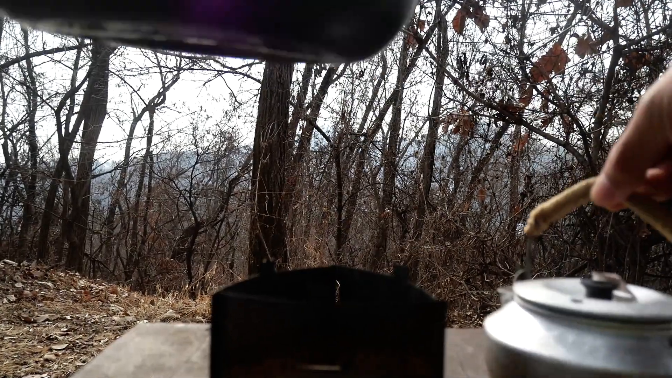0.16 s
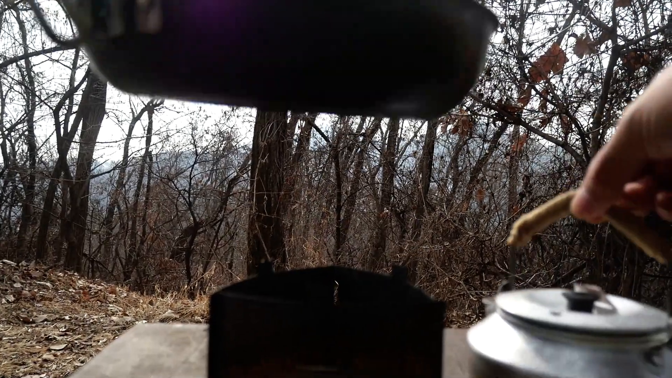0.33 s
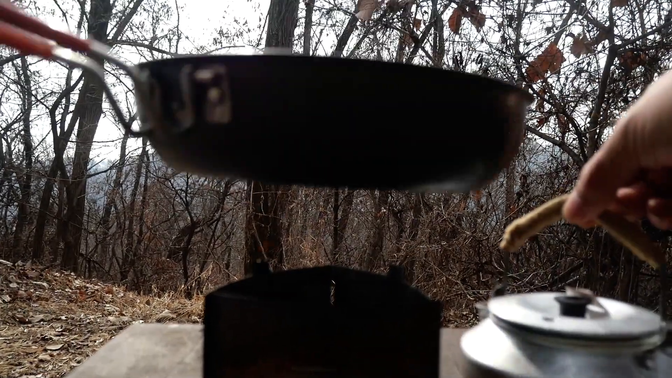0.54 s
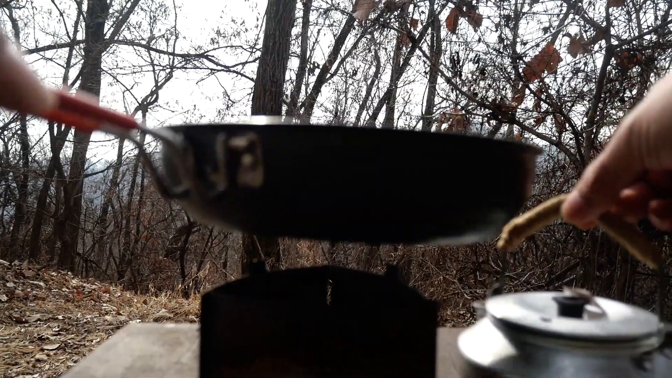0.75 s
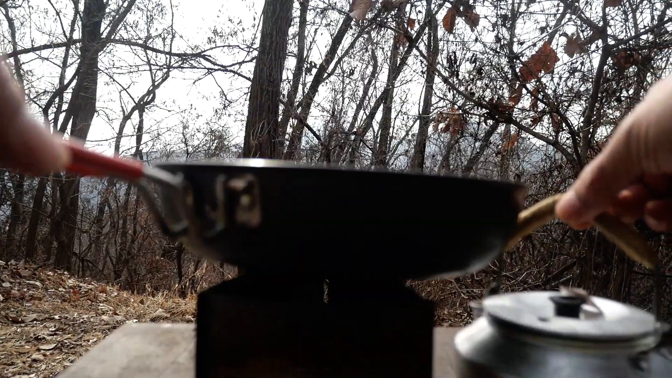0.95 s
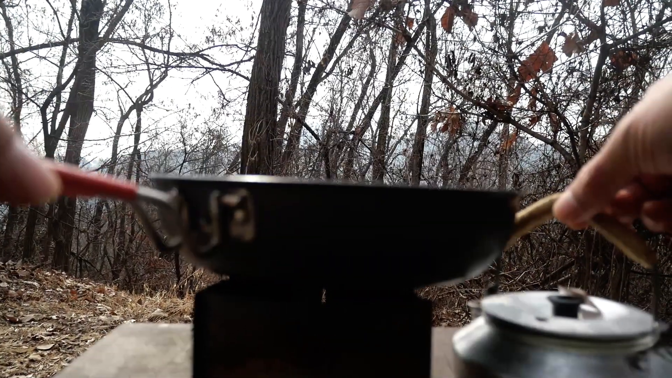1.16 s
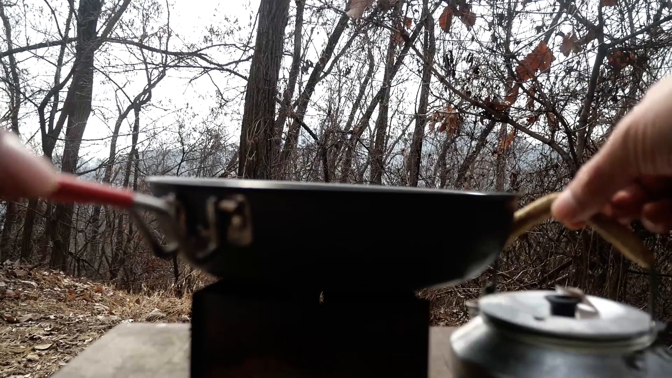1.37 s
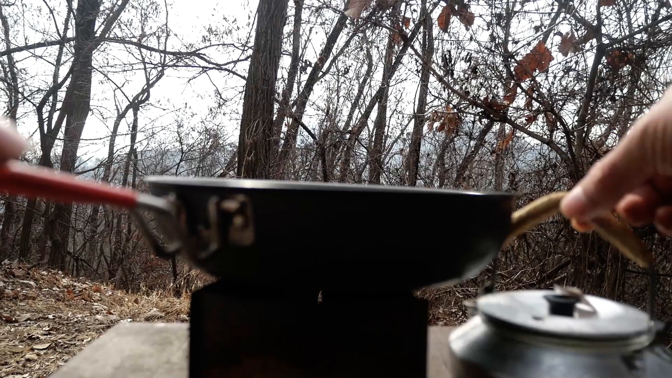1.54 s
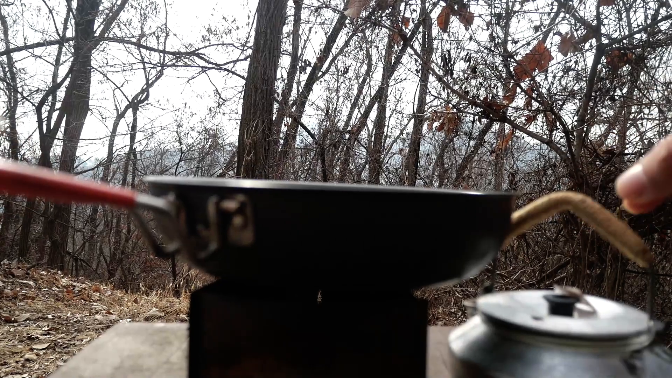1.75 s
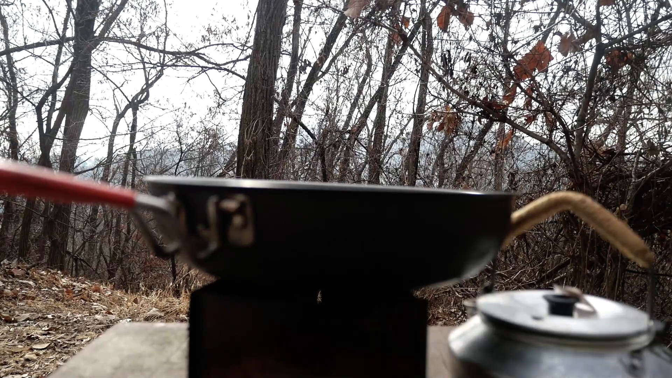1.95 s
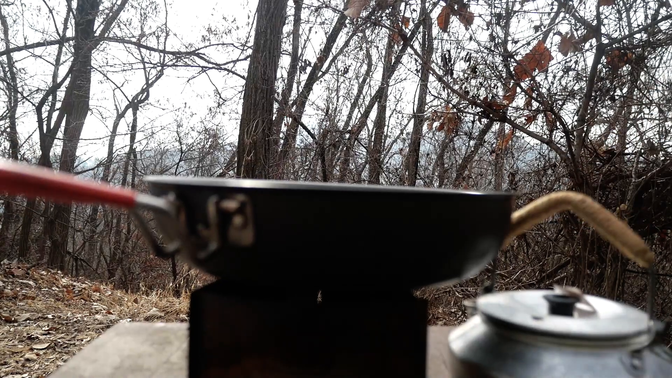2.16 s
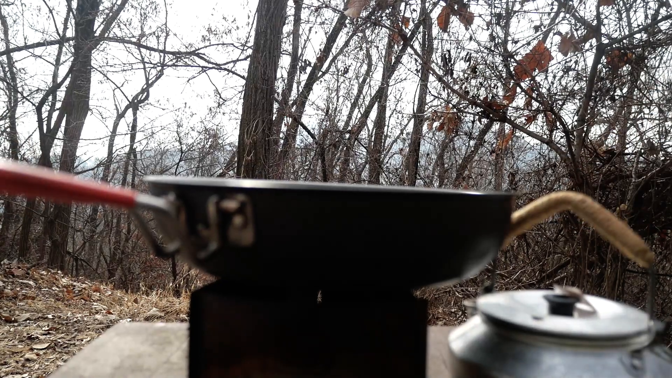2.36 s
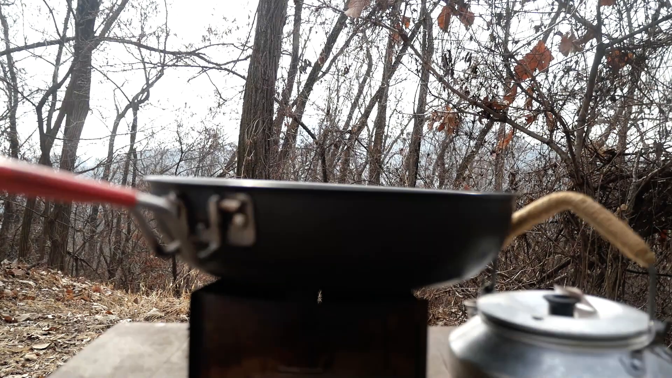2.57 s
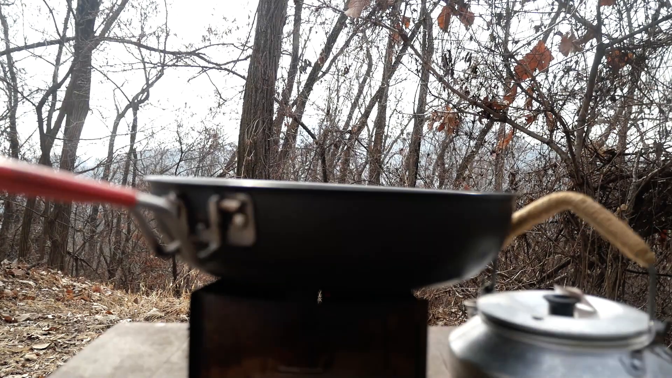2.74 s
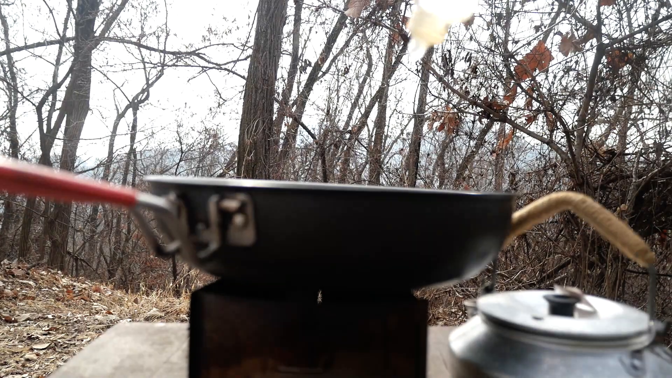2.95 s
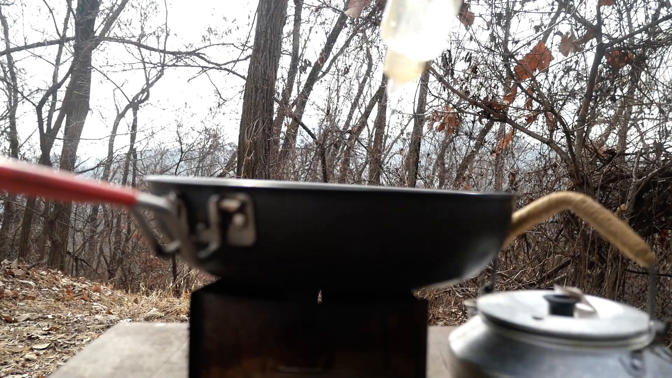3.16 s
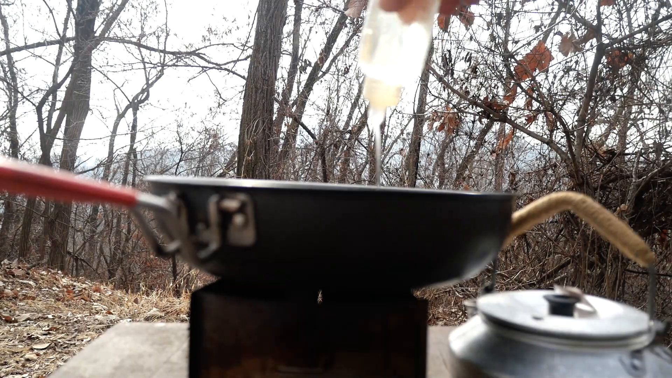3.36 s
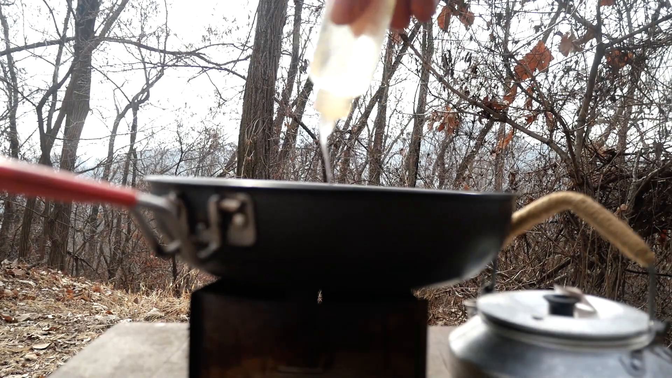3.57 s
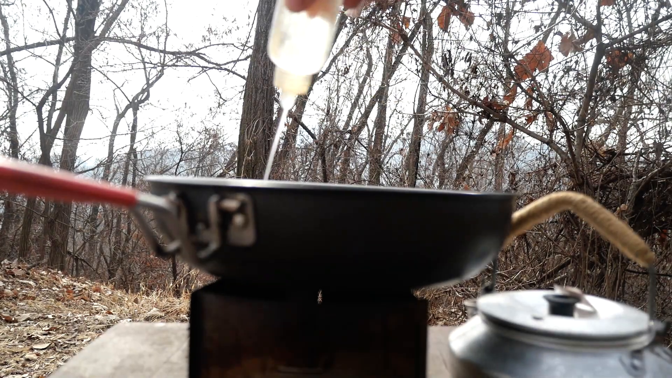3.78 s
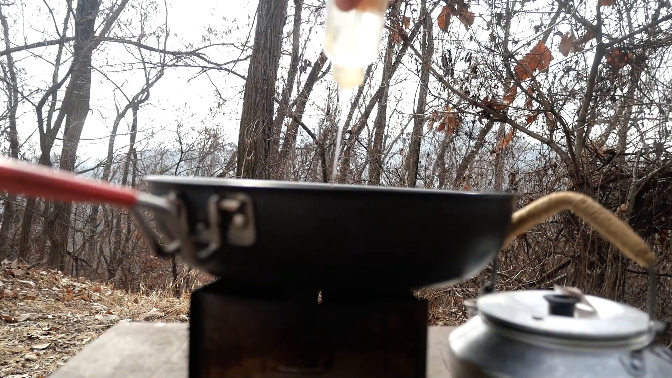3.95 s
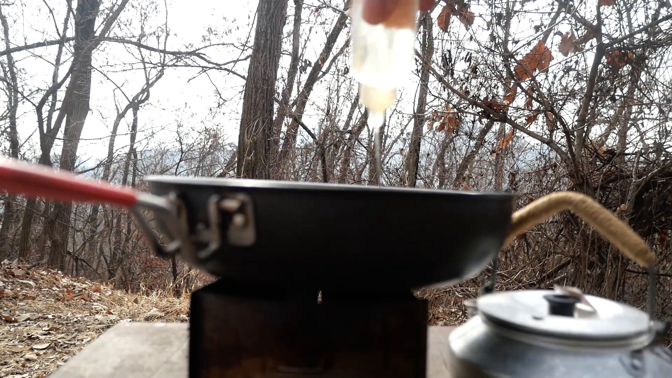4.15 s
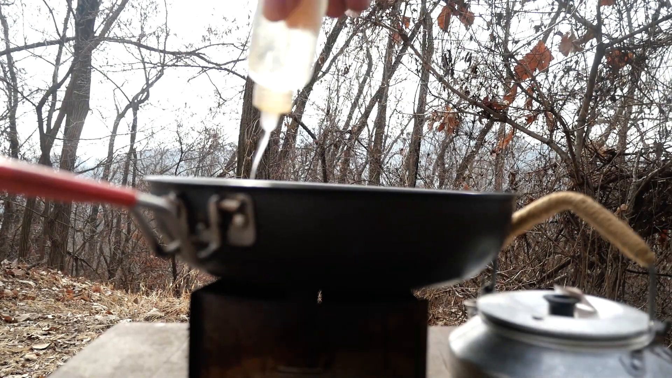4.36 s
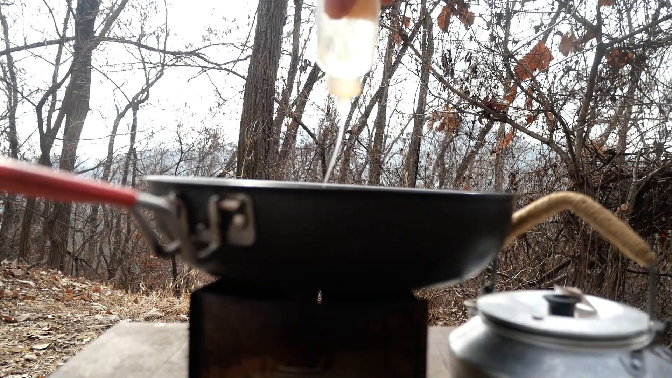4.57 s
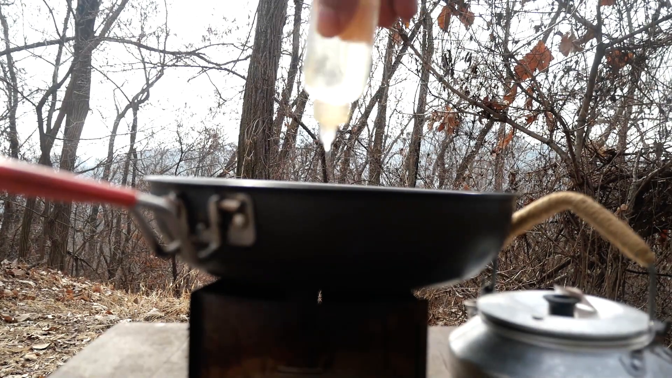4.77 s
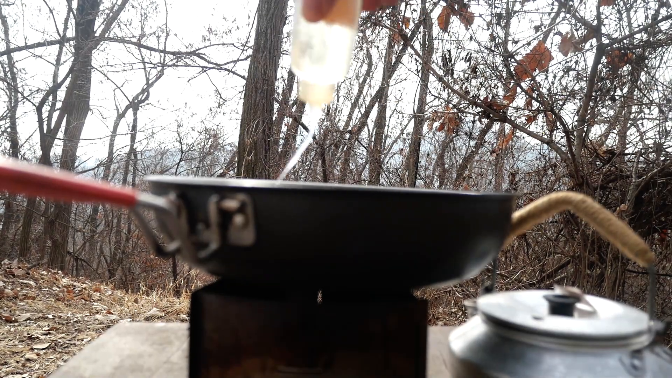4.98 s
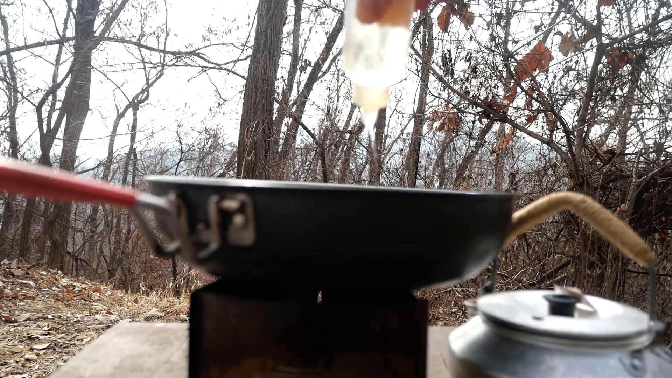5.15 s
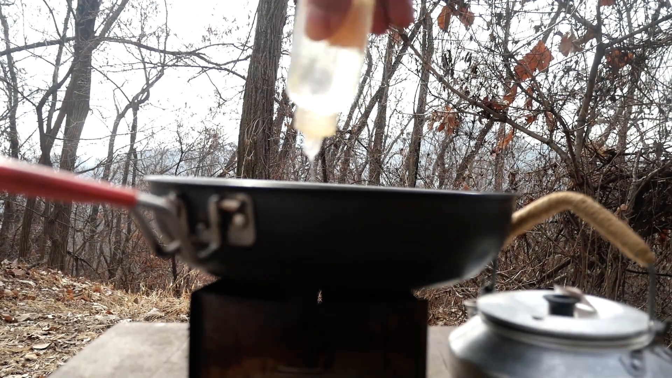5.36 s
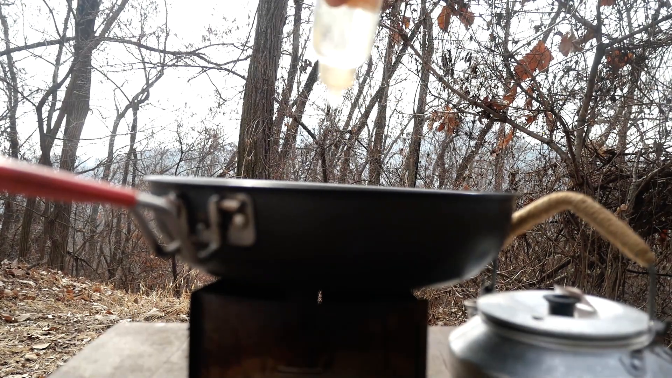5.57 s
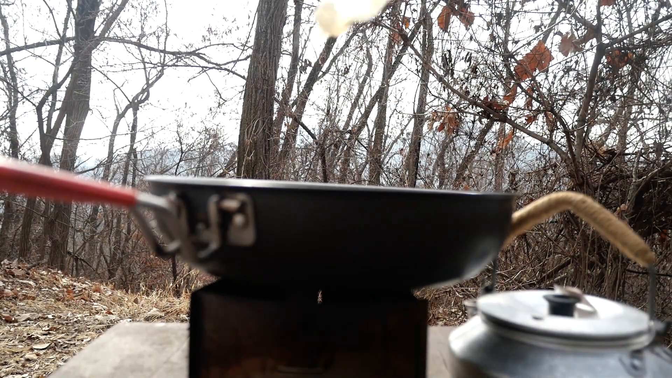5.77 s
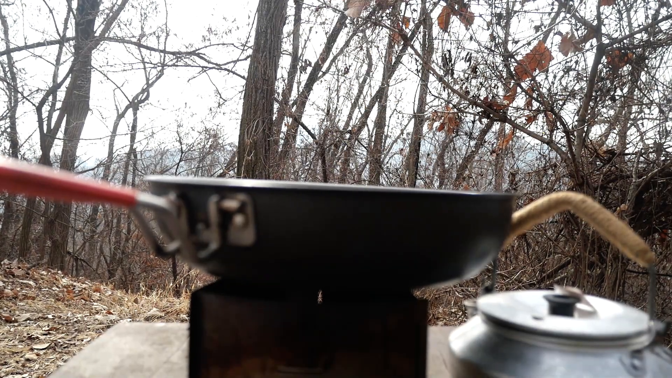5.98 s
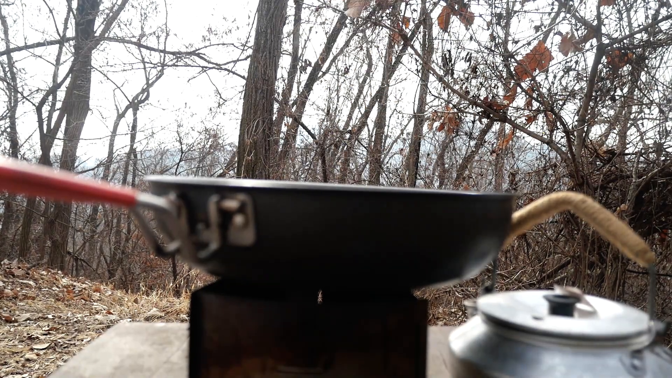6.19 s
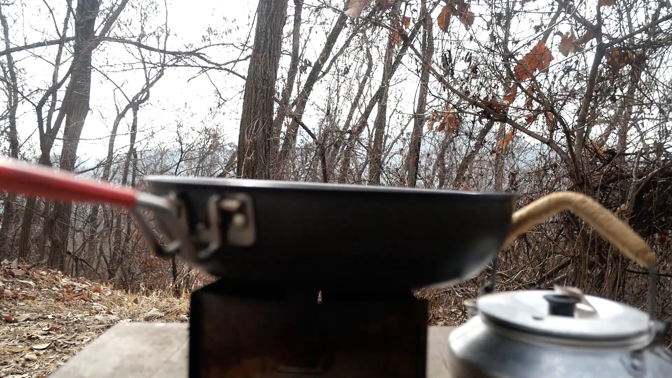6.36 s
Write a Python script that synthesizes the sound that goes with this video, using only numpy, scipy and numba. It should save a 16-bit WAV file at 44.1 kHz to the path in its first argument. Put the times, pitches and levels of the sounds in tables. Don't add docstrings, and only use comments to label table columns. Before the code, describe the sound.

Faint air, hiss and a low hollow stove hum lie under everything. Stiff sleeves brush near the microphones; a heavy kettle lands with a damped clunk at half a second. Soon a pan clanks loudly onto thin metal, rebounding in quick ringing knocks. A calm stretch with sparse dry ticks follows, then squeezed-bottle suction whistles, a crisp cap click and a last sleeve rustle, all close and dry.

```python
import sys
import numpy as np
from scipy import signal
from scipy.fft import rfft, irfft
from scipy.io import wavfile
from scipy.ndimage import uniform_filter1d
from numba import njit

SR = 44100
rng = np.random.default_rng(int(sys.argv[2]) if len(sys.argv) > 2 else 0)


def wav_record(signal):
    frames = np.transpose(np.atleast_2d(signal))
    bounded = np.clip(frames, -1, 1)
    quanta = np.round(bounded * 32767).astype(np.int16)
    wavfile.write(sys.argv[1], SR, quanta)


def invert_db(level):
    return 10 ** (np.asarray(level, dtype=float) / 20)


N = 283116
TIME = np.arange(N) / SR


def level(x, db):
    return x * invert_db(db) / np.sqrt(np.mean(x ** 2))


def sides(left_minus_right_db):
    return invert_db(np.array([left_minus_right_db, -left_minus_right_db]) / 2).reshape(2, -1)


@njit
def svf(x, hz, width):
    y, band_state, low_state = np.empty(len(x)), 0., 0.
    for i in range(len(x)):
        g, damping = np.tan(np.pi * hz[i] / SR), width / hz[i]
        v = (band_state + g * (x[i] - low_state)) / (1 + g * (g + damping))
        band_state, low_state = 2 * v - band_state, low_state + 2 * g * v
        y[i] = damping * v
    return y


def band(x, hz, width):
    return svf(x, np.full(len(x), 1. * hz), 1. * width)


def walk(rate):
    hold = int(SR / rate)
    steps = np.repeat(rng.standard_normal(N // hold + 1), hold)
    return 1.3 * uniform_filter1d(uniform_filter1d(steps, hold), hold)[:N]


def add(out, s, sound):
    i = int(s * SR)
    out[:, i:i + sound.shape[1]] += sound[:, :N - i]


def ring(modes, seconds, tilt_db, scatter_db, spread_db, push_s):
    hz, db, t60 = np.transpose(modes)[:, :, None]
    t = TIME[:int(seconds * SR)]
    strength, aim = rng.standard_normal((len(modes), 2)).T[:, :, None]
    gain = invert_db(db + tilt_db * np.log2(hz / 1000) + scatter_db * strength - 60 * t / t60)
    polarity = np.sign(np.cos(hz / 150))
    onset = 1 - np.exp(-t / push_s)
    tone = gain * np.sin(2 * np.pi * hz * t) * polarity * onset
    aim_db = spread_db * np.sqrt(hz / 2000) * aim
    return np.array([np.sum(tone * invert_db(side * aim_db), axis=0) for side in (1, -1)])


def crack(db, t60, low_hz, high_hz, wide):
    n = SR // 10
    mid, side = rng.standard_normal((2, n)) * invert_db(db - 60 * TIME[:n] / t60)
    edges = signal.butter(2, [low_hz, min(high_hz, .45 * SR)], "band", fs=SR)
    return signal.lfilter(*edges, [mid + wide * side, mid - wide * side])


def small_knocks(events, spread, late_s, t60_1k, shorten):
    out = np.zeros((2, N))
    for s, db, hz, crack_db, *aside in events:
        t60 = t60_1k * (1000 / hz) ** shorten
        place = sides(aside[0] if aside else 0)
        cluster = [(hz, 0, t60),
                   (hz * (1 - spread), -7, 0.59 * t60),
                   (hz * (1 + spread), -7, .7 * t60),
                   (hz * 1.6, -16, 0.32 * t60)]
        add(out, s + late_s, ring(cluster, .15, 0, 1.8, 0.78, 0.000517) * invert_db(db - 1.0) * place)
        burst = crack(db + crack_db, 0.15 * t60 + .004, .7 * hz, min(3.5 * hz, 9500), .3)
        add(out, s + late_s, burst * place)
    return out


def whistle(puffs, width, upper, flutter_db):
    swell, fade, glide, edge_db = .15, .35, .6, -10
    out = 0
    for s, length, from_hz, to_hz, db in puffs:
        part = (TIME - s) / length
        pitch = to_hz + (from_hz - to_hz) * np.exp(-np.maximum(part, 0) / glide)
        shape_db = np.interp(part, [0, swell, 1 - fade, 1], [edge_db, 0, 0, edge_db], left=-99, right=-99)
        air = svf(rng.standard_normal(N), pitch, width)
        air = air + upper * svf(rng.standard_normal(N), 1.18 * pitch, 0.85 * width)
        air = svf(air, 1.07 * pitch, 4.7 * width)
        out = out + level(air, 0) * invert_db(db + shape_db + flutter_db * walk(40))
    return out * sides(0.85)


def sleeves():
    # (time [s], effort [dB], brushing tilt [dB per band step], left minus right [dB])
    movement = [(0, -67, 0, 4), (.16, -63.5, 2, 5), (.34, -61, 1.2, 5.5), (.62, -62.5, 0, 6),
                (.72, -64.5, -4.5, 2.5), (.92, -65, -.5, 6), (1.14, -68.5, -4, 3), (1.7, -70.5, 0, 3),
                (2.55, -70, 1.5, 3), (2.57, -63.5, 2.2, 12), (2.69, -61, 2.5, 11), (2.78, -70, -2, 1.5),
                (3.3, -74, -.5, 1.5), (3.46, -68, -1, 3.5), (3.75, -77, -1.2, 3), (5.82, -78, -1, 4),
                (5.95, -71, -3.5, 0), (6.32, -61, 2.2, 4)]
    # (low edge [Hz], high edge [Hz], level [dB])
    cloth_bands = [
        (170, 1150, 2.2),
        (1500, 5500, -2),
        (5300, 9140, -2),
        (10500, 15300, 1),
    ]
    lumps_db, widths = (3.2, 2.5, 1.2, .8), (.3, .6, .9, .95)
    s, *controls = np.transpose(movement)
    effort_db, brush_db, lr_db = (np.interp(TIME, s, c) for c in controls)
    out = 0
    for k, ((*edges_hz, db), lump_db, wide) in enumerate(zip(cloth_bands, lumps_db, widths)):
        slips = invert_db(lump_db * walk(60))
        cloth = signal.butter(2, edges_hz, "band", fs=SR, output="sos")
        mid, side = (level(signal.sosfilt(cloth, rng.standard_normal(N) * slips), 0) for _ in range(2))
        gain = invert_db(effort_db + brush_db * (k - 1.5) + db - 3.5)
        out = out + gain * (mid + wide * side * np.array([[1], [-1]]))
    rumble = band(band(rng.standard_normal(N), 110, 150), 73, 200)
    shake = level(rumble, 0) * invert_db(effort_db - 1.4 * brush_db - 7)
    return out * sides(lr_db) + shake


def wood():
    # (frequency [Hz], density [dB per Hz])
    spectrum = [(15, -37.5), (25, -3.5), (117, -5.5), (285, -6.5), (326, -8.5), (384, -3), (416, -12),
                (754, -7.5), (1480, -14), (1790, -19), (16000, -26)]
    # (frequency [Hz], likeness [0-1])
    coherence = [(60, 0.73), (130, 0), (290, 0.46), (640, 0.9), (1410, 0.1), (3100, 0.07), (6820, 0),
                 (15000, 0)]
    log_hz = np.log(np.fft.rfftfreq(N, 1 / SR) + 1)
    spectrum_hz, spectrum_db = np.transpose(spectrum)
    like_hz, likeness = np.transpose(coherence)
    shape = invert_db(np.interp(log_hz, np.log(spectrum_hz), spectrum_db))
    like = np.clip(np.interp(log_hz, np.log(like_hz), likeness), 0, 1)
    mid, side = (irfft(rfft(rng.standard_normal(N)) * shape * np.sqrt(1 + sign * like), N) for sign in (1, -1))
    air = level(np.array([mid + side, mid - side]), -63.5 - 4.0) * invert_db(.6 * walk(3))
    flame = rng.standard_normal(N) * invert_db(3.0 * np.tanh(walk(14)))
    cavity_hz = 745
    return air + level(band(band(flame, cavity_hz, 70), cavity_hz, 130), -78.5)


def handling_ticks():
    # (time [s], peak [dB], pitch [Hz], crack over peak [dB])
    events = [(0.292, -45, 335.5, -8), (0.365, -49.5, 1180, -15), (0.513, -52, 850, 4),
              (0.718, -47, 600, -6), (.743, -48, 750, -6), (0.759, -46, 360, 0), (.768, -48, 330, -3),
              (.779, -53, 900, -5), (0.797, -48, 250, -8), (.817, -52, 220, 0), (.831, -52, 650, -3),
              (0.841, -51, 740, -3), (.857, -53, 300, -3), (.877, -52, 480, -3), (.932, -55, 400, -3),
              (0.969, -48, 517, -2), (1.022, -44, 1084, -5), (1.035, -52, 600, -3), (1.068, -51, 450, 0),
              (1.082, -52, 350, 3), (1.141, -56, 856, -12), (2.618, -51.5, 720, 0), (2.675, -48.5, 306, 15),
              (2.8, -48, 400, 8), (3.005, -55, 247, -6.5), (3.091, -47.5, 675, -5), (3.441, -52, 600, -2),
              (3.451, -50, 443, 13), (3.465, -46.5, 420, 17), (3.553, -56, 365.5, -8),
              (5.758, -53, 638, -5), (5.79, -58.5, 566, -10), (5.896, -58, 700, 0), (5.912, -43, 560, -10),
              (5.924, -50, 600, 0), (5.935, -48, 450, 0), (5.939, -54, 1250, -8), (5.9555, -42, 480, -6),
              (5.965, -53, 500, 0), (6.114, -55, 272, -9), (6.253, -52, 300, 3), (6.267, -53, 350, 0),
              (6.286, -54, 330, 0), (6.297, -53, 380, 0), (6.313, -54, 450, 0), (6.341, -55, 350, 0)]
    return small_knocks(events, .3, .0015, .028, .05)


def kettle():
    # (frequency [Hz], level [dB], t60 [s])
    modes = [(100, -30, 0.08), (225, -9, 0.048), (346, -7, 0.016), (468, -5.5, 0.038), (600, -1.5, 0.038),
             (796, 1, 0.013), (972, -7, 0.013), (1400, -3, 0.022), (1620, -8, .02), (1975, -1.5, 0.03),
             (2770, -5.5, 0.044), (2840, -16, 0.073), (3500, -16, .012), (4310, -26.5, 0.19),
             (4700, -14, 0.018), (5220, -9.5, 0.028), (6350, -15, 0.013), (7150, -25.5, 0.01)]
    # (time [s], body [dB], tilt [dB per octave], crack [dB], left minus right [dB])
    bumps = [(.552, -52, 0, -55, -2), (0.558, -47, -5, -49, -2.5), (0.5613, -35, -3, -41.5, -2),
             (0.567, -37, -8, -48, 0), (0.5722, -28.5, -8, -45, -1.5), (0.5758, -32, 2, -42, -0.5),
             (.579, -38, 1, -48, 0), (0.584, -38, -2.5, -50, -9), (.5885, -29, 0, -36, -1),
             (.596, -25, 3.5, -26, -6), (.6010, -36, -1, -30, 0.5)]
    # (on the edge [dB], tipping flat [dB], lid ticking [dB])
    freedom_db = [(10, 8, 8), (1, 1, -2), (1, 1, 0), (1, 1, 3), (1, 1, 4), (1, 1, 2), (1, 1, 1), (-3, 2, 3),
                  (2, -3, -1), (-1, -1, 0), (-3, -3, -1), (-2, 0, 2), (0, 2, 5), (-8, -6, -3), (-2, -1, 1),
                  (-9, -5, -6), (-4, -1, -1), (-4, 1, 0)]
    tips_s = [.586, .594]
    out = np.zeros((2, N))
    for s, body_db, tilt_db, crack_db, lr_db in bumps:
        held = np.array(modes)
        held[:, 1] += np.array(freedom_db)[:, np.searchsorted(tips_s, s)]
        add(out, s, ring(held, 0.34, tilt_db, 1.5, 1.5, 0.00064) * invert_db(body_db) * sides(lr_db))
        add(out, s, crack(crack_db, 0.036, 1500, 9000, .6) * sides(lr_db))
    return out


def pan_handle():
    # (start [s], length [s], from [Hz], to [Hz], level [dB])
    squeaks = [
        (.70, .09, 3350, 3300, -78),
        (.845, .04, 3300, 3300, -75),
        (.89, .03, 3500, 3450, -76),
        (.915, .03, 3100, 2950, -74),
        (.96, .04, 3300, 3300, -76),
        (1.13, .05, 3100, 3350, -69),
    ]
    return whistle(squeaks, 140., 0, 6.5)


def stove():
    # (frequency [Hz], level [dB], t60 [s])
    modes = [(100, -27, 0.1), (185, -13, 0.16), (233.8, -18.5, 0.19), (344, -18, 0.046), (560, -13, 0.03),
             (689, -1.5, 0.092), (740, -6, 0.037), (1135, -6, .03), (1250, -3, .03), (2010, -5.5, 0.024),
             (2610, 1, 0.038), (3132, -18.5, 0.12), (3750, -11, 0.045), (4170, -13, .03), (4800, -12, .04),
             (5300, -22, .035), (6580, -20, .035), (7450, -32.5, 0.071)]
    # (time [s], walls [dB], tilt [dB per octave], crack [dB], left minus right [dB])
    contacts = [(1.175, -49.5, 3, -34, -0.5), (1.1765, -19, 1.5, -17.5, -0.5),
                (1.2860, -18.5, 0, -17, -0.5), (1.2930, -23.5, -0.5, -28.5, -2), (1.304, -36, 2, -34, 0),
                (1.317, -21.5, 4, -21, 1), (1.3240, -19.5, -1, -24.5, -2.5), (1.3285, -28, 2, -26, 0),
                (1.336, -26, 1, -23, 1), (1.339, -20, 0, -24.5, -2.5), (1.3495, -30, 2, -25, 0.5),
                (1.3570, -29, 4.5, -29, 0.5), (1.363, -36, 3, -36, 0), (1.37, -38, 3, -38, 0),
                (1.4010, -36.5, 1, -49, 0), (1.408, -42, 3, -52, 0), (1.4140, -44, -8, -58.5, 0),
                (1.42, -46, 4, -56, 0), (1.4285, -40, 0, -42, 2.5), (1.4341, -28, 2.5, -31, 0.5),
                (1.4430, -34, 2, -36.5, 5.5), (1.4570, -37.5, -0.5, -45.5, 4)]
    shifts_s = [1.285, 1.316, 1.345, 1.4, 9]
    # (struck [dB], tipped [dB], rocking [dB], leaning [dB], settled [dB])
    freedom_db = [(2, 2, 3, 8, 3), (0, -2, -1, 7, 4), (0, -3, -4, 6, 0), (0, 0, 0, 6, 2), (-3, 2, 3, 6, -3),
                  (3, 0, 0, -6, -7), (2, 1, 6, -5, -4), (-3, -2, -6, -3, 5), (0, -2, -3, -3, 1),
                  (-3, -1, -5, -8, -2), (0, 2, -5, -1, 1), (0, 0, 0, 0, 4), (-3, -2, 1, 4, 0),
                  (1, -1, 0, 1, -1), (1, 1, 1, 3, -2), (0, -2, -2, 0, 0), (-3, 3, 0, -4, -2),
                  (0, 0, 0, 0, 0)]
    # (time [s], level [dB])
    grind = [
        (1.10, -76),
        (1.165, -56.5),
        (1.19, -45),
        (1.28, -56),
        (1.34, -37.5),
        (1.41, -53.5),
        (1.45, -42),
        (1.48, -58),
        (1.6, -80),
    ]
    damp_db_per_s = 1800
    out = np.zeros((2, N))
    for s, stove_db, tilt_db, crack_db, lr_db in contacts:
        stance = np.searchsorted(shifts_s, s)
        bent = np.array(modes) * [1, 1, .85]
        bent[:, 0] += bent[:, 0] * .008 * rng.standard_normal(len(modes))
        bent[:, 1] += np.array(freedom_db)[:, stance]
        walls = ring(bent, .25, tilt_db, 1.2, 1.8, 0.00082) * invert_db(stove_db) * sides(lr_db)
        past_shift = np.maximum(s + TIME[:walls.shape[1]] - shifts_s[stance], 0)
        add(out, s, walls * invert_db(-damp_db_per_s * past_shift))
        add(out, s, crack(crack_db, 0.038, 730, 5000, .6) * sides(lr_db))
        add(out, s, crack(crack_db - 14, .024, 5500, 11500, .9) * sides(lr_db + 4.0))
    bursts = np.minimum(rng.exponential(size=N // 40 + 1), 2.5).repeat(40)[:N]
    grit = rng.standard_normal((2, N)) * invert_db(2.5 * bursts)
    grit[1] = 0.51 * grit[0] + 1.25 * grit[1]
    scrape = []
    for g in grit:
        resonant = sum(invert_db(db) * band(g, hz, 5.5 / t60 + 120) for hz, db, t60 in modes)
        scrape.append(resonant + invert_db(-24) * band(band(g, 4500, 4000), 4500, 5000))
    return out + level(np.array(scrape), 0) * invert_db(np.interp(TIME, *np.transpose(grind), left=-150, right=-150))


def pan_rings():
    mode_hz = [1003, 1014, 1125, 1555, 2387, 2603, 2910, 2993, 3192, 3337, 3400, 3562, 3662, 4061, 4372,
               4700, 4926, 5356, 5510, 5895, 6565, 6724, 7246, 7585, 8333, 10250, 10580, 11120]
    # (t60 [s], struck at the rim [dB], tipped on one arm [dB], rocking on two arms [dB])
    modes = [(0.45, -23, -32, -53.5), (0.99, -61.5, -60, -27), (0.11, -38.5, -49.5, -52),
             (2, -39, -48, -43), (0.39, -24, -44, -45.5), (0.39, -33, -34, -29.5), (0.66, -33, -51, -50.5),
             (.3, -37.5, -45, -45.5), (.25, -52.5, -57, -54.5), (.2, -17.5, -24.5, -28),
             (.11, -44.5, -50.5, -42), (.39, -45, -55.5, -53.5), (.22, -44.5, -51.5, -35.5),
             (0.22, -30, -36.5, -48.5), (0.45, -38, -34, -29.5), (.23, -42, -34.5, -43.5),
             (0.1, -41, -47.5, -39.5), (.17, -50, -53, -54.5), (0.21, -50.5, -48.5, -51),
             (.25, -54, -61, -58.5), (.2, -51, -41.5, -56.5), (0.12, -40.5, -55, -54.5),
             (.21, -52.5, -58.5, -62), (0.1393, -55, -61, -60), (0.12, -55, -62.5, -57.5),
             (0.097, -48, -59, -53.5), (.17, -57, -65, -66.5), (0.22, -57, -65, -64)]
    # (Hz above, level relative to the mode in each of three strikes [dB])
    twins = [(11, -6, -6, -20), (25, -22, -12, -7)]
    twinned = (0, 14)
    # (struck [s], choked by the next contact [s])
    strikes = [
        (1.1765, 1.285),
        (1.286, 1.318),
        (1.3185, 1.401),
    ]
    # (frequency [Hz], level [dB], t60 [s])
    rim = [(5717, -58, .2), (5965, -48, .054), (6218, -56, .11), (6928, -60, .16), (7440, -50, .076),
           (8140, -64, .2), (8839, -58, .18), (9900, -53, .07), (12050, -62, .1), (12720, -54, .079),
           (12890, -58, .14), (13310, -58, .1), (13680, -64, .12), (15050, -62, .11)]
    rim_db = (0, -6, -8)
    choke_db_per_s = 2200
    out = np.zeros((2, N))
    t60, *strike_db = np.transpose(modes)
    for n, ((s, choked), db) in enumerate(zip(strikes, strike_db)):
        partners = [(mode_hz[k] + up, db[k] + less[n], t60[k]) for k, (up, *less) in zip(twinned, twins)]
        bell = ring(list(zip(mode_hz, db, t60)) + partners, .3, 0, 0, 2.1, 0.0017)
        bell += ring(rim, .3, 0, 1.5, 1.5, .001) * invert_db(rim_db[n])
        past_choke = np.maximum(TIME[:bell.shape[1]] - (choked - s), 0)
        add(out, s, bell * invert_db(-choke_db_per_s * past_choke))
    return out


def stand_clacks():
    # (time [s], peak [dB], pitch [Hz], crack over peak [dB])
    events = [
        (1.1768, -20, 830, -20),
        (1.1772, -23, 4400, -12),
        (1.3175, -17, 1990, -20),
        (1.3178, -21, 4400, -15),
        (1.3995, -35, 1130, -20),
    ]
    return small_knocks(events, .12, 0, .035, .4)


def after_rings():
    # (time [s], peak [dB], pitch [Hz], crack over peak [dB], left minus right [dB] if off centre)
    events = [
        (1.493, -51, 726, -17, 1.3),
        (1.634, -51, 738, -12, 1.5),
        (1.654, -51, 707, -25),
        (5.838, -40, 4400, -20),
    ]
    return small_knocks(events, 0.051, 0, .11, 1.5)


def dry_snaps():
    # (time [s], peak [dB], pitch [Hz], crack over peak [dB], left minus right [dB] if off centre)
    events = [(1.5494, -52, 2530, -11, 4), (1.9859, -50, 900, -4, -15.5), (2.0343, -47, 600, 3, -7),
              (2.1355, -46.5, 650, 3, -6), (2.2129, -57, 950, -6, -13), (2.3794, -63.5, 3890, -5, 3),
              (3.0245, -61, 1653, 8, -1), (3.4261, -59, 1560, 7, -5), (3.4794, -53, 1740, -3, -3),
              (3.4914, -59, 3820, 3, 6), (3.6152, -59, 1745, 0, -2), (3.8594, -55.5, 975, 7, -4),
              (4.3999, -59, 1765, 7, -2), (5.205, -62, 2600, -8, 0), (5.59, -58, 1250, -8, 0),
              (5.4116, -58.5, 923, 9), (5.4745, -56.5, 1706, 3, 1.5), (5.5992, -43, 1600, -14, 3),
              (5.8371, -44, 1280, -12, -1), (6.4165, -38, 1500, 0, -4)]
    return small_knocks(events, 0.2423, 0.00055, .018, .15)


def nozzle():
    # (start [s], length [s], from [Hz], to [Hz], level [dB])
    puffs = [
        (3.365, .07, 1250, 1600, -67),
        (5.415, .06, 5300, 3000, -74),
        (5.455, .16, 3900, 3650, -73),
        (5.73, .19, 3700, 3600, -71),
        (5.775, .06, 3700, 3700, -70),
    ]
    return whistle(puffs, 340.0, 0.5, 2.5)


def bottle_cap():
    # (time [s], peak [dB], pitch [Hz], crack over peak [dB], left minus right [dB] if off centre)
    events = [(5.7095, -37, 1900, -13, 5), (5.7136, -19, 3333, -11, -2), (5.7137, -22, 4500, -26, 3),
              (5.7177, -21.5, 3150, -33), (5.7212, -22.5, 2270, -29), (5.7250, -29.5, 1780, -30.5),
              (5.7280, -34, 1800, -32), (5.7315, -38, 1820, -32), (5.7145, -38, 900, -8),
              (5.722, -40, 617, -9), (5.729, -41, 900, -14)]
    return small_knocks(events, 0.262, 0, .018, .6)


def scene():
    knocks = handling_ticks() + kettle() + stove() + pan_rings() + stand_clacks()
    knocks += after_rings() + dry_snaps() + bottle_cap()
    t = TIME[:SR // 4]
    scatter = rng.standard_normal((2, len(t))) * invert_db(-48 - 60 * t / .12) * (t > .002)
    scatter = signal.lfilter(*signal.butter(2, 4500, fs=SR), scatter)
    knocks = knocks + signal.fftconvolve(knocks, scatter, axes=1)[:, :N]
    knocks = signal.sosfilt(signal.butter(3, 75, "high", fs=SR, output="sos"), knocks)
    return sleeves() + wood() + knocks + pan_handle() + nozzle()


def top_cut(x):
    return signal.sosfilt(signal.butter(12, 16620, fs=SR, output="sos"), x)


def record(dry):
    gap_start_s, gap_end_s, fade_s = 2.553, 2.565, .003
    gate = np.clip(np.maximum((gap_start_s - TIME) / fade_s, (TIME - gap_end_s) / fade_s), 0, 1)
    dull = signal.sosfilt(signal.ellip(8, .2, 60, 15800, fs=SR, output="sos"), dry * gate)
    return top_cut(dull)


dry = scene()
out = record(dry)
wav_record(out)
```